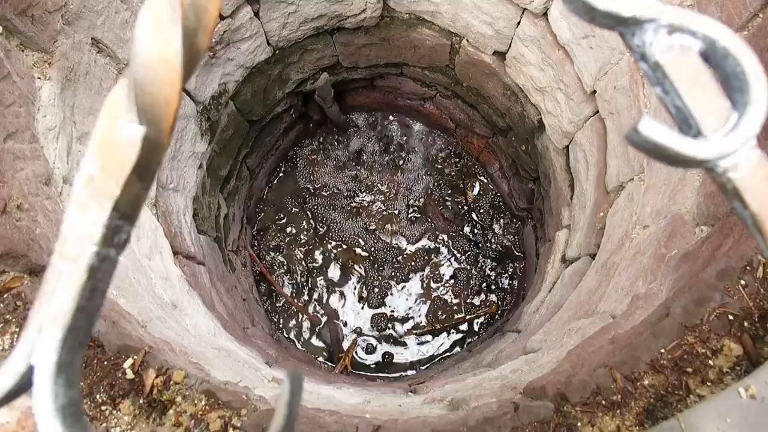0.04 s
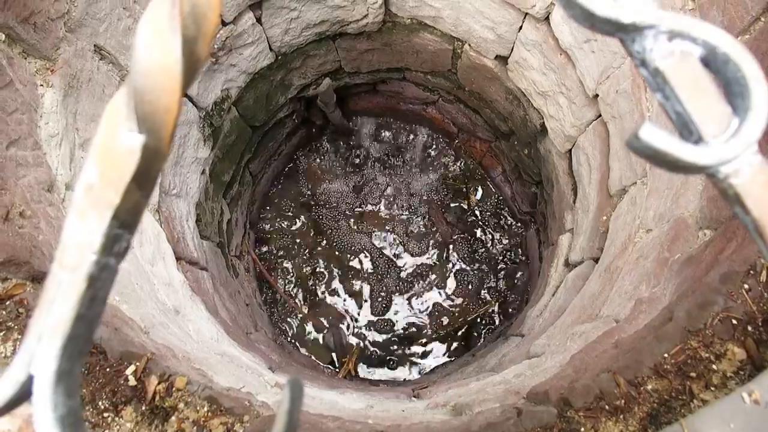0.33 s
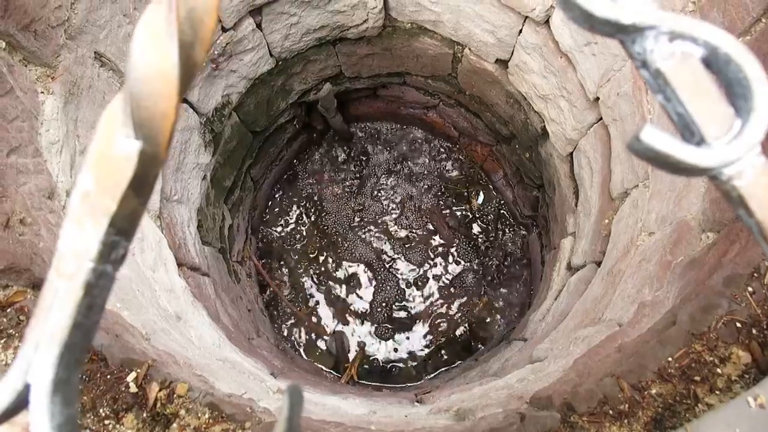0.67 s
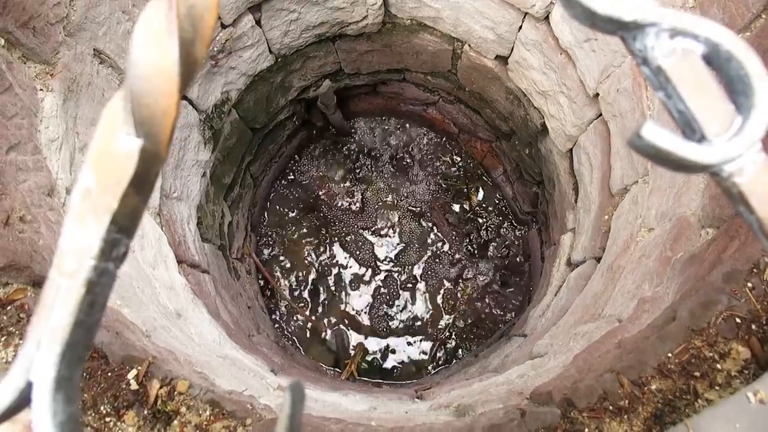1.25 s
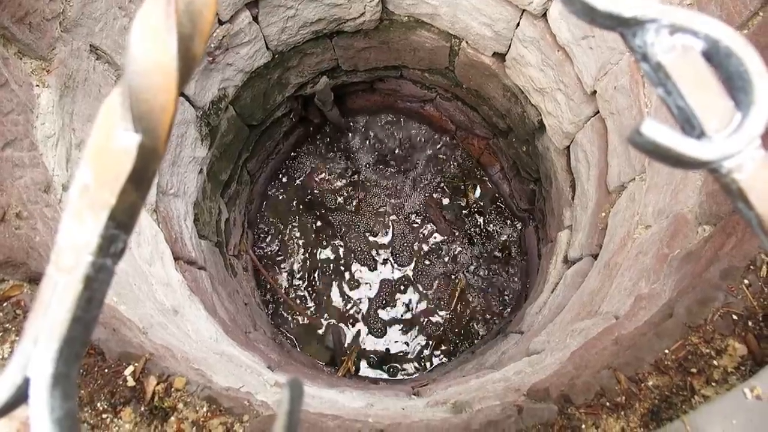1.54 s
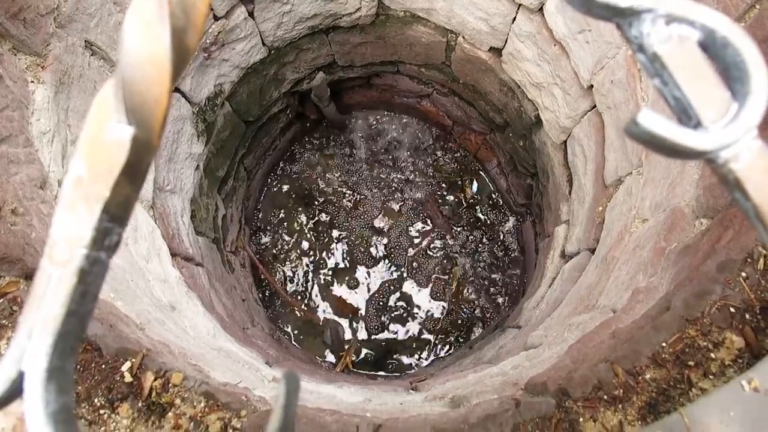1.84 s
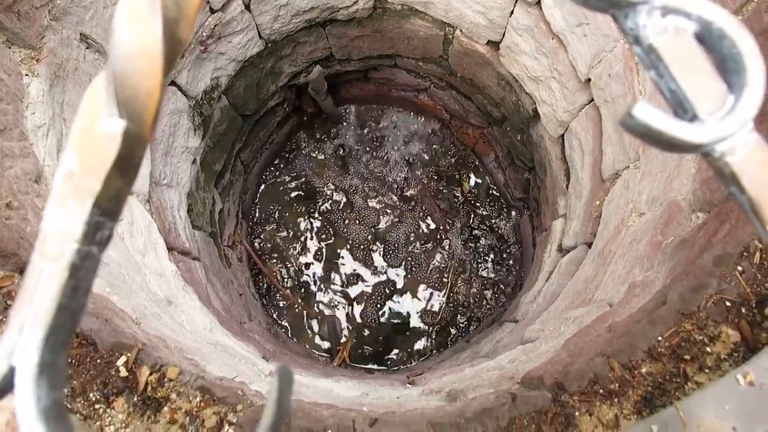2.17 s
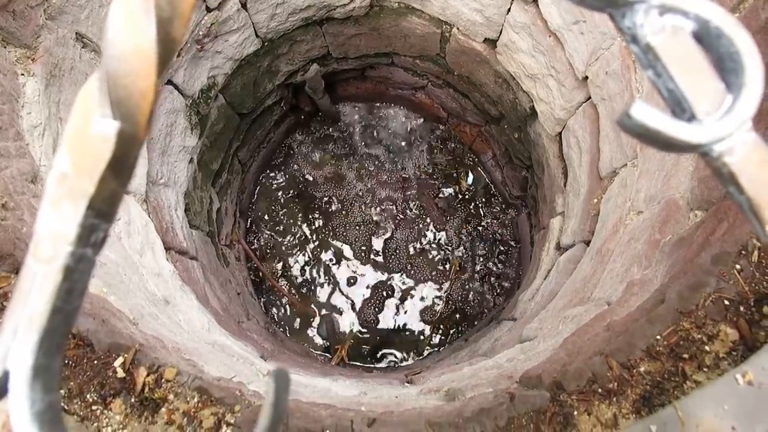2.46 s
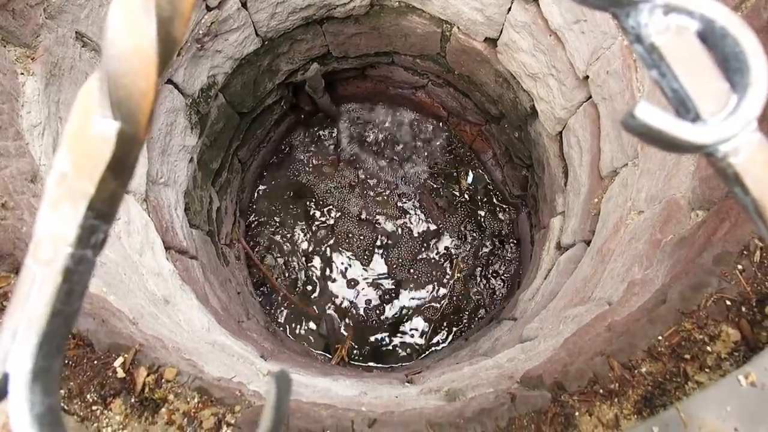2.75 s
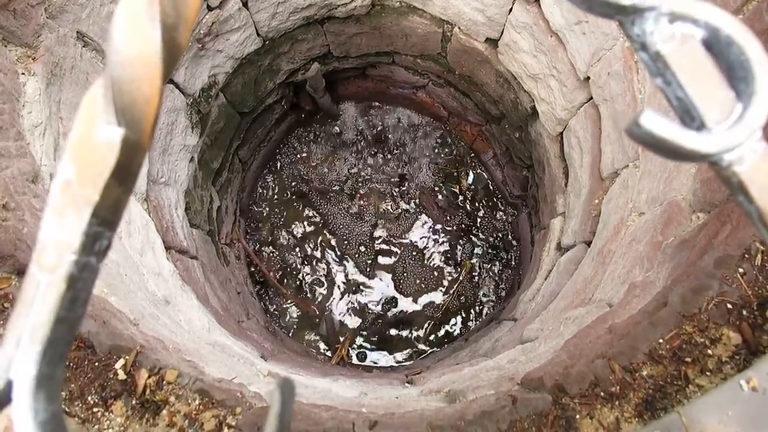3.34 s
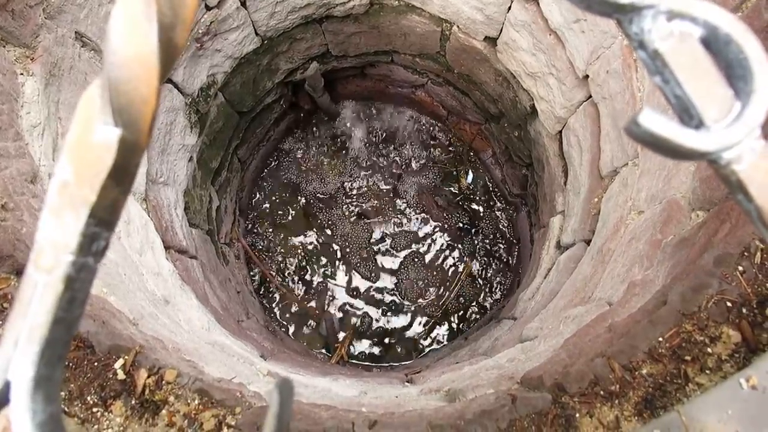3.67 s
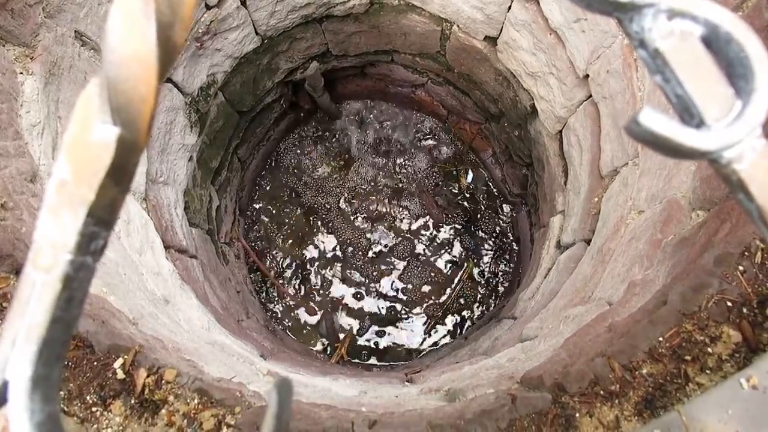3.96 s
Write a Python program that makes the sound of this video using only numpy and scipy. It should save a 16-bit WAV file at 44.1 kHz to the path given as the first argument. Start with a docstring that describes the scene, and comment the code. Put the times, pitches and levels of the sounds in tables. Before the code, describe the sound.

Water bubbles and gurgles in a round stone well, heard from just above the rim. Hollow gulps mix with small pops, droplets and fizzing foam over a faint low rumble, swelling midway and then easing slightly.

```python
"""Gas wells up through a spring in a round stone shaft, heard from just above its rim.
After a quarter second of silence, the water is heard over a faint low rumble. Each bubble rings as a
damped oscillator: big ones gulp and glug with rising pitch and excite the shaft's air column, small
ones plip, and foam fizzes. From half a second on, single bubbles pop and droplets shower down.
The bubbling is strongest around two seconds, then eases."""
import sys
import numpy as np
from scipy import signal
from scipy.fft import rfft, irfft, next_fast_len
from scipy.io import wavfile
from scipy.ndimage import uniform_filter1d, map_coordinates

SR = 44100
rng = np.random.default_rng(int(sys.argv[2]) if len(sys.argv) > 2 else 0)


def unload_audio(sound):
    """Save the sound as a 16-bit wav file, at the path given as the first command line argument."""
    columns = np.transpose(np.atleast_2d(sound))
    # keep every value between -1 and 1, then stretch to whole-number steps
    steps = np.round(np.clip(columns, -1, 1) * 32767)
    wavfile.write(sys.argv[1], SR, steps.astype(np.int16))


N = 176400

# Spectra of the two noise beds. Each row: frequency in Hz, relative level in dB.
RUMBLE_SPECTRUM = [(20, -25), (33, -9), (39, 0), (45, 18.5), (53, 1), (68, 9.5), (100, -7), (180, -35),
                   (400, -70)]
WASH_SPECTRUM = [(53, -40), (90, -6), (130, 11.5), (179, 1.5), (282, 0), (365, 9), (424, -9), (550, -13),
                 (883, -4), (1300, -10.5), (1480, -19), (3080, -22), (5060, -20.5), (9440, -28),
                 (15500, -36)]
# Strength of a bubble in each swarm. Each row: starting pitch in Hz, relative level in dB.
HEAVE_SIZES = [(98, -4), (118, -1.5), (140, -0.5), (185, -1.5)]
GULP_SIZES = [(175, -14), (225, -0.5), (300, 5), (350, 2.5), (420, -15.5)]
GLUG_SIZES = [(460, 3.5), (540, 1.5), (660, -1.5), (800, 0), (1050, 0)]
PLIP_SIZES = [(1000, -6.5), (1350, -3.5), (2100, 2), (2900, -3)]
FIZZ_SIZES = [(2800, -8.5), (4500, 3.5), (7000, 1.5), (10000, 1.5), (13000, 0.5), (16000, -12)]
# Strength of each swarm over time. Each row: time in seconds, relative level in dB.
HEAVE_FLOW = [(.26, -39), (.5, -30), (.62, -23.5), (.69, -34), (.78, -27), (.87, -40), (1.07, -27),
              (1.17, -38), (1.26, -31), (1.7, -34.5), (1.87, -26.5), (2.1, -34), (2.27, -27.5),
              (2.4, -28.5), (2.7, -32.5), (3.1, -37), (3.55, -31.5), (4, -39.5)]
GULP_FLOW = [(.26, -29), (.5, -28.5), (.6, -29.5), (.75, -28.5), (1.2, -26.5), (1.33, -34), (1.43, -25),
             (1.52, -20.5), (1.62, -26.5), (1.8, -25.5), (1.92, -25), (2.08, -21), (2.2, -27),
             (2.55, -25.5), (3.2, -32.5), (3.4, -27.5), (4, -31.5)]
GLUG_FLOW = [(.26, -30.5), (.31, -42), (.38, -27), (.6, -28.5), (.7, -27), (.93, -33), (1.18, -26.5),
             (1.27, -35), (1.34, -25.5), (1.43, -33), (1.52, -25.5), (1.57, -28), (1.93, -27.5),
             (2.1, -27.5), (2.25, -26.5), (2.35, -29.5), (2.45, -29.5), (2.6, -26.5), (3.3, -31), (4, -29)]
PLIP_FLOW = [(.26, -50), (.33, -48.5), (.42, -40), (.5, -42.5), (.66, -43), (.72, -44.5), (.8, -37.5),
             (.9, -41.5), (1.28, -44.5), (1.5, -41.5), (2, -42.5), (2.15, -38.5), (2.42, -43.5),
             (2.8, -40.5), (3, -45.5), (3.4, -43), (4, -43)]
FIZZ_FLOW = [(.26, -44), (.5, -43), (.6, -45), (.67, -39), (.73, -49), (.8, -41.5), (1.1, -43.5),
             (1.4, -45), (1.7, -42), (2.08, -44.5), (2.13, -36), (2.2, -42.5), (2.85, -41.5), (3, -45),
             (4, -42.5)]
# Single bubbles: large ones, small ringing ones and skins snapping open.
# Each row: start in seconds, relative peak level in dB, pitch in Hz.
LARGE_BUBBLES = [(0.248, -25, 845), (0.553, -12.5, 875), (0.574, -9, 209), (0.594, -11.5, 270),
                 (0.656, -12.5, 194), (0.68, -23.5, 259), (1.136, -16, 668), (1.158, -15.5, 558),
                 (1.19, -10.5, 680), (1.288, -8.5, 225.7), (1.329, -9, 266), (1.343, -12, 546),
                 (1.374, -17, 538), (1.473, -9, 274), (1.51, -9, 558), (1.519, -7, 304.5),
                 (1.547, -17, 557), (1.608, -15, 591), (1.658, -9, 303), (1.709, -15.5, 910),
                 (1.765, -12.5, 349), (1.803, -12, 227), (1.812, -17, 569), (1.84, -14, 163),
                 (1.86, -10.5, 296), (1.895, -11.5, 234), (1.897, -8, 371), (1.937, -7.5, 235),
                 (1.944, -12.5, 574), (1.964, -6, 285), (1.996, -11, 277), (2.011, -15.5, 606),
                 (2.066, -18, 248), (2.072, -4, 310.5), (2.078, -11.5, 528), (2.16, -14.5, 564),
                 (2.239, -16.5, 709), (2.399, -11.5, 338), (2.496, -13, 285), (2.524, -9.5, 612),
                 (2.557, -12, 355), (2.598, -14, 563), (2.619, -18, 548), (2.638, -12, 574),
                 (2.72, -9, 334), (2.802, -21, 546), (2.822, -14, 342), (2.869, -13.5, 532),
                 (2.935, -12.5, 555), (2.984, -18.5, 598), (3.029, -15, 348), (3.089, -13, 560),
                 (3.249, -14, 565), (3.351, -9.5, 318), (3.399, -14, 585), (3.43, -18.5, 332),
                 (3.465, -19, 518), (3.499, -9.5, 868), (3.627, -20, 873), (3.929, -15.5, 558)]
PLINKS = [(.538, -22.5, 1087), (.556, -27, 964), (.648, -32, 1500), (.662, -30, 4900), (.68, -29, 4930),
          (.897, -26.5, 1880), (.927, -31.5, 2530), (1.01, -24, 2184), (1.025, -34, 2300),
          (1.045, -28, 2610), (1.145, -33, 8900), (1.42, -26, 2090), (1.68, -24, 1142), (1.715, -21, 884),
          (2.115, -26, 7650), (2.16, -23, 1140), (2.19, -31, 10000), (2.31, -28, 1510), (2.512, -35, 4380),
          (2.585, -28.5, 2144), (3.092, -25.5, 962), (3.88, -24.5, 1430), (3.962, -27.5, 6520)]
SNAPS = [(1.795, -27.5, 8900), (1.796, -28, 13000), (1.947, -26.5, 9100), (2.13, -19, 6740),
         (3.648, -25, 4380)]
# Droplet showers. Each row: start in seconds, length in seconds, droplet level in dB,
# middle pitch in Hz, pitch scatter in octaves.
SHOWERS = [(0.64, .012, -38.5, 9700, .15), (0.649, 0.033, -32.5, 1570, 0.13),
           (0.654, .04, -37, 5100, 0.044), (0.681, 0.019, -42, 10500, .15), (.76, 0.0084, -38.5, 8650, .25),
           (0.763, 0.033, -40.5, 3020, 0.16), (0.804, .008, -39, 9000, .15), (0.817, .035, -38, 12900, .1),
           (0.959, 0.055, -38, 3440, 0.14), (1.038, 0.011, -44, 2600, .08), (1.268, 0.015, -40, 9300, .07),
           (1.411, .04, -35, 2270, 0.05), (1.676, 0.061, -37, 1750, .13), (2.481, .02, -36.5, 2500, 0.072),
           (2.574, 0.027, -46, 2290, 0.088), (2.744, .012, -39.5, 12000, .13),
           (2.748, 0.035, -40.5, 2860, .2), (2.806, 0.012, -40.5, 7800, 0.14),
           (2.867, 0.027, -41, 7100, .13), (3.614, .01, -41, 2950, 0.11)]
# Air modes of the shaft. Each row: frequency in Hz, bandwidth in Hz, gain over the direct sound in dB.
SHAFT_MODES = [(135, 7.9, 6.5), (218.5, 11, 5), (274.2, 3.8, 10), (538.7, 19, 9), (605.4, 53, 8.5),
               (706, 53, 10.5), (873, 18.6, 9), (1170, 85, 0), (1442, 86, 1.5)]
# Reverberation of the walls. Each row: frequency in Hz, time to fall by 60 dB in seconds.
WALL_T60 = [(200, 0.24), (1500, 0.23), (5000, 0.04), (14000, 0.066)]
# Echo common to both ears (mid) and opposed (side). Each row: frequency in Hz, relative gain in dB.
ECHO_MID = [(100, -22.5), (600, -2.5), (1300, -0.5), (4000, 1), (14000, 2.5)]
ECHO_SIDE = [(125, -15.5), (300, -12.5), (700, -10.5), (1300, -3.5), (2400, -9.5), (5000, -3.5), (9000, 3),
             (14000, 5)]
# Stereo balance of the water. Each row: frequency in Hz, left minus right level in dB.
BALANCE = [(100, 0.7), (700, 1.8), (1400, 1.3), (3000, 0.1), (6000, 1), (9000, -3), (13000, 2)]


def amp(db):
    """Amplitude grows tenfold for every 20 dB."""
    return 10 ** (np.asarray(db) / 20)


def unit(x):
    """Normalisation to an rms of 1."""
    return x / np.sqrt(np.mean(x ** 2) + 1e-20)


def along(points, hz):
    """Interpolation of (Hz, value) points on a logarithmic frequency axis."""
    f, values = np.transpose(points)
    return np.interp(np.log(hz + 1), np.log(f + 1), values)


def flow(rows):
    """Amplitude envelope, linear in decibels between (seconds, dB) points."""
    return amp(np.interp(np.arange(N) / SR, *np.transpose(rows)))


def filtered(x, response):
    """Linear filtering: the spectrum is multiplied by a frequency response."""
    size = next_fast_len(N + SR // 2)
    return irfft(rfft(x, size) * response(np.fft.rfftfreq(size, 1 / SR)), size)[..., :N]


def even(x, window_s=0.12):
    """An even gas supply: division by the running rms holds the slow level and keeps the flicker."""
    power = np.mean(x ** 2, axis=0)
    for _ in range(2):
        power = uniform_filter1d(power, int(window_s * SR))
    return x / np.sqrt(np.abs(power) + 1e-12)


def wobble(knots_per_s, count):
    """Smooth random curves by spline interpolation."""
    knots = rng.standard_normal((count, 1024))
    position = np.arange(N) * knots_per_s / SR
    return np.array([map_coordinates(k, [position], order=2, mode='wrap') for k in knots])


def ring(start_s, gain, hz, cycles, rise, onset):
    """Damped oscillators swell over `onset` cycles; in `cycles` they lose 60 dB and rise by rise * hz."""
    life_s = cycles / hz
    t = np.arange(int(min(life_s.max(), .25) * SR))[None] / SR
    age, turns = t / life_s[:, None], t * hz[:, None]
    envelope = np.exp(-np.log(1000) * age) * (1 - np.exp(-turns / onset))
    envelope /= envelope.max(1, keepdims=True)
    wave = gain[:, None] * envelope * np.sin(2 * np.pi * turns * (1 + rise * age / 2))
    samples = np.abs(start_s * SR).astype(int)[:, None] + np.arange(t.size)
    return np.bincount(samples.ravel(), wave.ravel(), N)[:N]


def swarm(sizes, count, cycles, rise, onset, spread_db):
    """Superposition of bubbles with random timing, pitch and life, and power-law amplitudes."""
    when, pitch, size, life = rng.random((count, 4)).T
    low_hz, high_hz = sizes[0][0], sizes[-1][0]
    hz = low_hz * (high_hz / low_hz) ** pitch
    gain = amp(along(sizes, hz) - spread_db * np.log(size + .02))
    start_s = (np.arange(count) + 2 * when) / count * N / SR
    return ring(start_s, gain, hz, cycles * 2 ** (life - .5), rise, onset)


def shaft(x):
    """Resonance: the air column adds its modes to the direct sound."""
    return filtered(x, lambda f: 1 + sum(amp(db) * 1j * f * width / (hz * hz - f * f + 1j * f * width)
                                         for hz, width, db in SHAFT_MODES))


def walls(x, echo_db=0, places=5):
    """Reflection between the stones: short echoes that change as bubbles surface in different places."""
    hz, t, noise = signal.stft(rng.standard_normal((2, places, SR // 5)), SR, nperseg=256)
    decay = amp(-60 * t / along(WALL_T60, hz)[:, None])
    tails = signal.istft(noise * decay / np.linalg.norm(decay, axis=1, keepdims=True), SR, nperseg=256)[1]
    tails /= np.linalg.norm(tails, axis=2, keepdims=True)
    shares = wobble(knots_per_s=45, count=places)
    shares /= np.linalg.norm(shares, axis=0)
    echo = signal.oaconvolve((x * shares)[None], tails, axes=2).sum(1)[:, :N]
    mid, side = filtered(amp(echo_db) * echo, lambda f: amp([along(ECHO_MID, f), along(ECHO_SIDE, f)]))
    return np.array([x + mid + side, x + mid - side])


def rumble():
    """Decorrelation: a steady low noise differs from ear to ear."""
    mid, side = filtered(rng.standard_normal((2, N)), lambda f: amp(along(RUMBLE_SPECTRUM, f)))
    side *= amp(3.5)
    return amp(-40.5) * unit(np.array([mid + side, mid - side]))


def wash():
    """Incoherent summation: countless faint bubbles blur into coloured noise."""
    blur = filtered(rng.standard_normal(N), lambda f: amp(along(WASH_SPECTRUM, f)))
    return amp(-36.5) * unit(walls(blur))


def gurgle():
    """Forced resonance: big bubbles heave, gulp and glug, driving the air in the shaft."""
    heaves = swarm(HEAVE_SIZES, count=200, cycles=14.8, rise=0.64, onset=1.1, spread_db=2.5)
    gulps = swarm(GULP_SIZES, count=400, cycles=15.0, rise=0.45, onset=0.74, spread_db=1.0)
    glugs = swarm(GLUG_SIZES, count=640, cycles=20.4, rise=0.39, onset=0.71, spread_db=1.5)
    layers = [(heaves, HEAVE_FLOW, -2), (gulps, GULP_FLOW, -3.5), (glugs, GLUG_FLOW, -3.3)]
    return sum(amp(db) * flow(curve) * even(walls(shaft(x))) for x, curve, db in layers)


def plips():
    """Pitch varies inversely with radius, so small bubbles ring high and briefly as they surface."""
    bubbles = swarm(PLIP_SIZES, count=2000, cycles=15.7, rise=0.13, onset=0.59, spread_db=5.0)
    return flow(PLIP_FLOW) * even(walls(shaft(bubbles)))


def fizz():
    """Heavy damping makes bursting foam a dense crackle; tiny droplets ping longer within it."""
    foam = swarm(FIZZ_SIZES, count=13000, cycles=3.9, rise=0.046, onset=0.15, spread_db=5.5)
    droplets = swarm(FIZZ_SIZES, count=2400, cycles=19, rise=.12, onset=0.59, spread_db=2.5)
    crackle = unit(foam) + amp(-13) * unit(droplets)
    return amp(-1.6) * flow(FIZZ_FLOW) * even(walls(crackle, places=12))


def large_bubbles():
    """Volume pulsation: gas pockets break loose and bloop; smaller ones ring more cycles and rise less."""
    start_s, db, hz = np.transpose(LARGE_BUBBLES)
    cycles = 24.3 * (hz / 400) ** .5
    rise = 0.65 * 400 / hz
    start_hz = hz / (1 + 0.1654 * rise)  # the glide passes up through the listed pitch
    bloops = ring(start_s, amp(db), start_hz, cycles, rise[:, None], onset=3.5)
    return amp(-10.0) * walls(bloops + amp(-14.5) * shaft(bloops), echo_db=-10.5)


def pops():
    """Damping sets the timbre: at the surface, lightly damped bubbles plink upward and others snap."""
    start_s, db, hz = np.transpose(PLINKS)
    plinks = ring(start_s, amp(db), hz, cycles=70, rise=.18, onset=3.5)
    start_s, db, hz = np.transpose(SNAPS)
    snaps = ring(start_s, amp(db), hz, cycles=15.0, rise=0.064, onset=0.19)
    return walls(amp(-2.5) * plinks + amp(4.5) * snaps, echo_db=-7.0)


def splashes(count=24, scatter_db=2, climb=1.05):
    """Impulsive excitation: a collapsing dome throws pinging droplets, the higher tending to come last."""
    pings = np.zeros(N)
    for start_s, length_s, db, middle_hz, scatter_octaves in SHOWERS:
        when, life = rng.random((2, count))
        pitch, size = rng.standard_normal((2, count))
        progress = (np.arange(count) + when) / count
        octaves = scatter_octaves * (pitch + climb * (progress - .5))
        pings += ring(start_s + length_s * progress, amp(db + scatter_db * size), middle_hz * 2 ** octaves,
                      cycles=24 * 2 ** (life - .5), rise=0.051, onset=0.28)
    return walls(pings, echo_db=-4.0)


def scene():
    """Superposition of all the water, leaning slightly left, and the rumble."""
    churn = amp(1.57 * wobble(knots_per_s=28, count=1))  # shared by the bubbles under the foam
    water = churn * (gurgle() + plips() + wash()) + fizz() + large_bubbles() + pops() + splashes()
    highpass = signal.butter(4, 82, 'high', fs=SR, output='sos')  # the water makes little deep bass
    water = signal.sosfilt(highpass, water)
    return filtered(water, lambda f: amp(np.outer([.5, -.5], along(BALANCE, f)))) + rumble()


def record(dry, start_s=.243, top_hz=15900):
    """Gating and band limiting: silence until the sound cuts in, and nothing above the top frequency."""
    lowpass = signal.ellip(12, .1, 90, top_hz, fs=SR, output='sos')
    return signal.sosfilt(lowpass, dry * (np.arange(N) / SR > start_s))


dry = scene()
out = record(dry)
unload_audio(out)
```